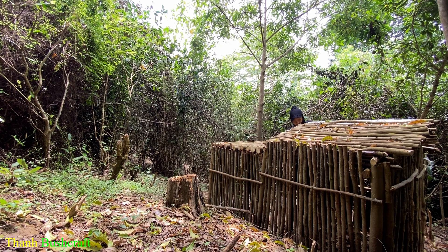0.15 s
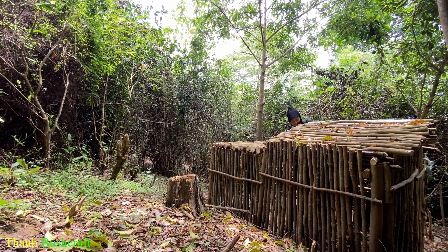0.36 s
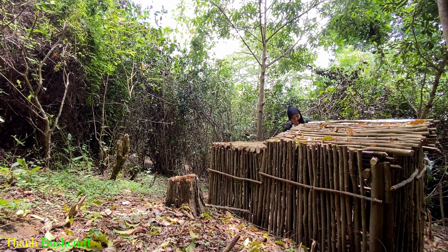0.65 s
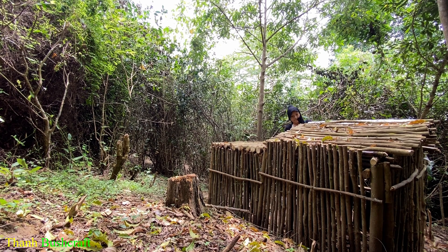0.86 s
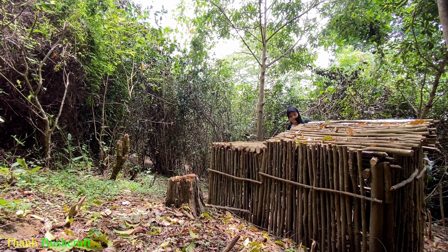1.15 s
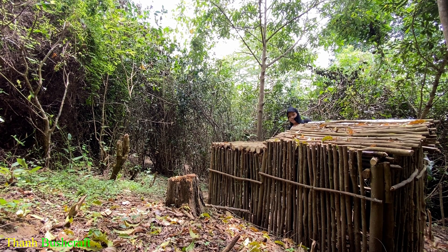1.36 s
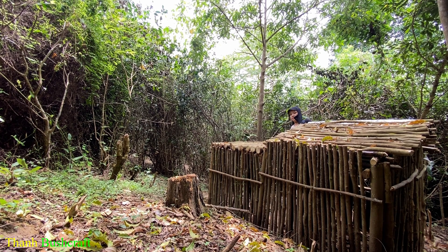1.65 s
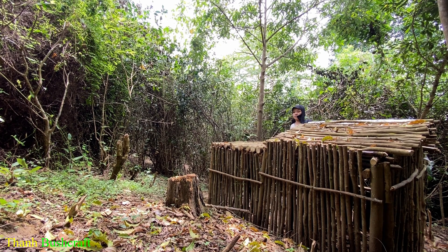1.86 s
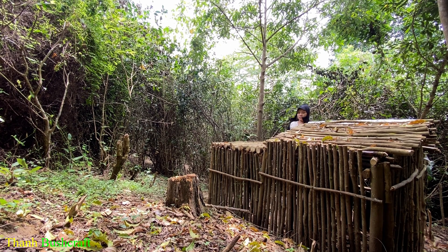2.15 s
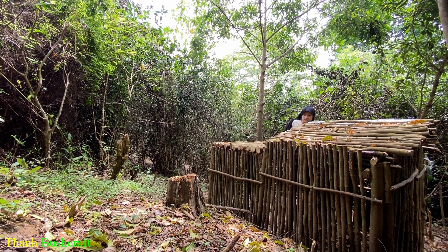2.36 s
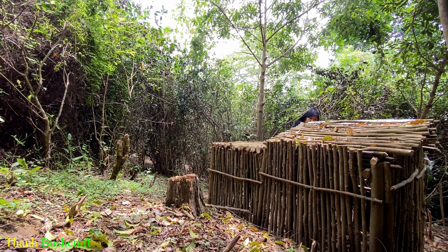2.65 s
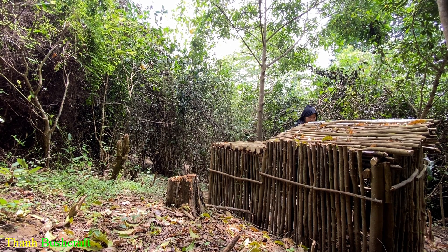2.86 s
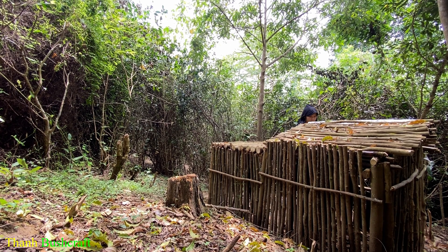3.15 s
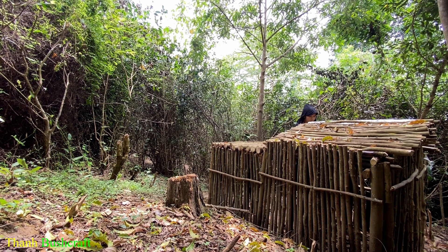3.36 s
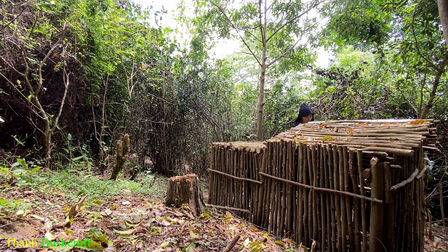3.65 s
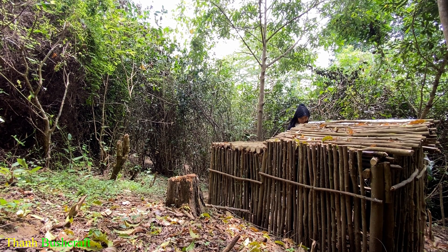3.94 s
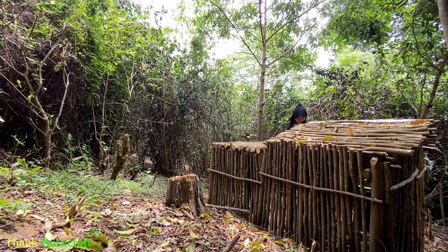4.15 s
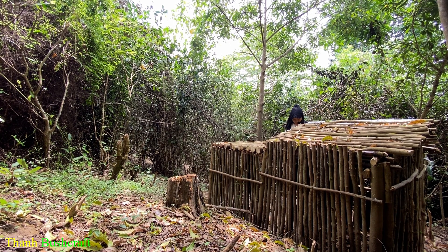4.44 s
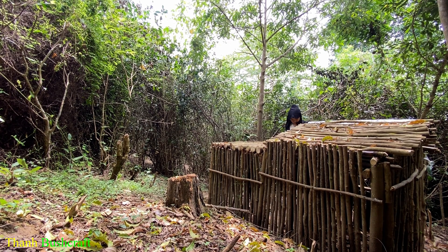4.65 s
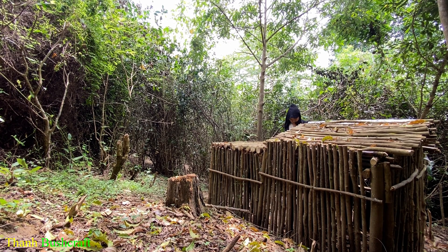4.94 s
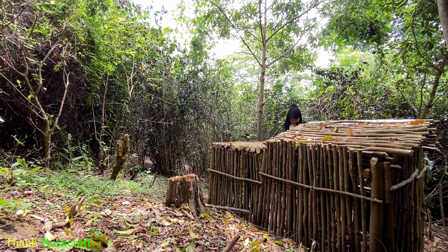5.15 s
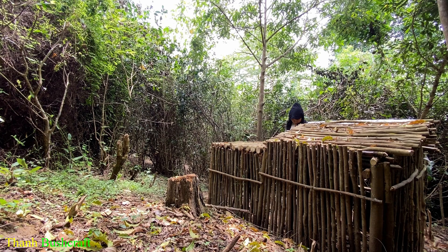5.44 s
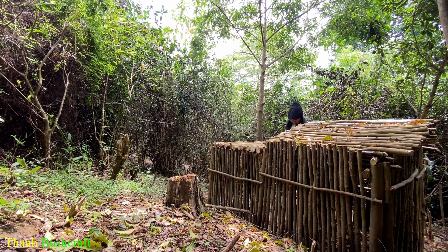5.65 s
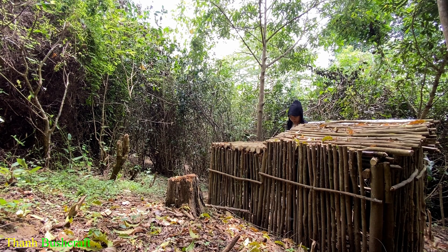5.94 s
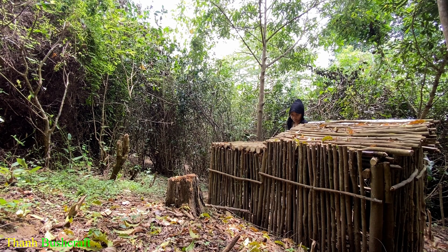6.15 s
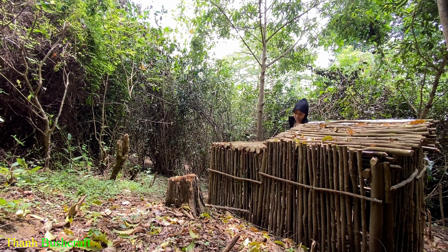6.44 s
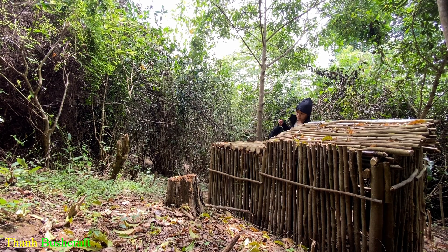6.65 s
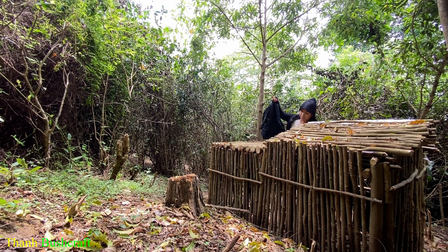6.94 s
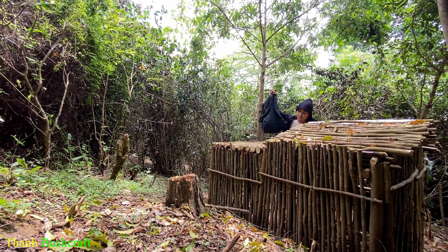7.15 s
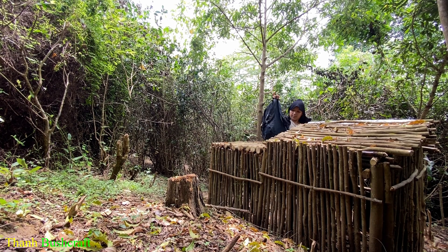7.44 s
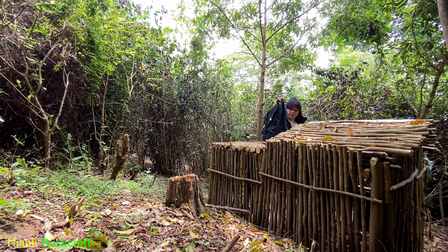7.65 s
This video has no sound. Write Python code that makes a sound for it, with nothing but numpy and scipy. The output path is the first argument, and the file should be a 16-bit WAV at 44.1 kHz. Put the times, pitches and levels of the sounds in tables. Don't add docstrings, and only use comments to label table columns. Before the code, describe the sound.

A forest clearing rings with constant high insects for nearly eight seconds: a steady cricket around 4.7 kHz, pulsing gently, a rougher one sliding down and climbing back about every 0.8 seconds, scratchy katydids near 7.5 kHz and a blurred cicada buzz. A low bird whistle flicks upward at 0.1 and 2.1. A smaller bird's faint, rapid falling phrases come around 1.6, 3.4, 5.0 and 6.8, blurred by trees. A far frog croaks faintly at 1.5-1.8, then more often from 3.6 to 6.7. Sticks knock at 0.4 and 1.4, more busily from 2.2 to 3.8, with a firm knock at 3.25; hollow taps follow at 4.8 and 5.3, and handling resumes from 6.2 to 7.1. Soft cloth rubs and leaf brushes accompany them. At 7.47 a bundle lands, by far the loudest event: a sharp crack and tumbling, hollow wooden clatter settling by 7.7. Faint rumble and hiss lie beneath; both channels are identical.

```python
import sys
import numpy as np
from scipy import signal
from scipy.fft import rfft, irfft, next_fast_len
from scipy.io import wavfile
from scipy.ndimage import uniform_filter1d, map_coordinates

SR = 44100
rng = np.random.default_rng(int(sys.argv[2]) if len(sys.argv) > 2 else 0)


def decibels_to_gain(level_db):
    exponent = np.asarray(level_db, float) / 20
    return 10 ** exponent


def output_pcm(signal):
    pcm = np.clip(np.atleast_2d(signal).T, -1, 1) * 32767
    wavfile.write(sys.argv[1], SR, np.round(pcm).astype(np.int16))


N = 343539

# t/s, level/dB
STEADY_LEVEL = [(0, -45.5), (.6, -42.5), (1.1, -45), (2.1, -45.5), (3.5, -45), (5.5, -44), (6.3, -45),
                (7.79, -45.5)]
# f/Hz, level/dB
WING_RADIATION = [(4500, -24), (4570, -4), (4628, -1), (4665, -1), (4700, 0), (4738, 0), (4790, -22)]
# t of slackest wings/s, lowest f/Hz, highest f/Hz
BREATHS = [(-.22, 4628, 4682), (.52, 4629, 4682), (1.24, 4626, 4676), (1.99, 4616, 4678),
           (2.79, 4623, 4677), (3.54, 4621, 4682), (4.26, 4621, 4688), (5.0, 4627, 4686),
           (5.82, 4624, 4692), (6.6, 4637, 4696), (7.37, 4637, 4696), (8.15, 4637, 4696)]
TENSION = [(0, 0), (.14, .2), (.42, .74), (.64, 1), (.76, .9), (.91, .15), (1, 0)]
# t/s, level/dB
UPPER_LEAN = [(0, 1), (3.4, 7.5), (4.2, 7.5), (6, 5), (7.79, 3.5)]
TENSE_LOSS_DB, SIDE_LINE_DB = 3.5, -6.5
# t of lowest tone/s, lowest f/Hz, peak level/dB, delay to peak/s
SAGS = [(0.082, 4266, -47, 0.017), (.34, 4323, -41, 0.28), (1.27, 4230, -40.5, 0.14),
        (2.014, 4180, -41, 0.14), (2.75, 4160, -39.5, 0.18), (3.508, 4118, -39.5, 0.3),
        (4.279, 4210, -39, 0.4), (5.102, 4234, -39, 0.4), (5.916, 4206, -37.5, 0.46),
        (6.781, 4245, -38.5, 0.45), (7.759, 4370, -38, 0.074)]
SWELL_S, START_DB, SLACK_DB, FADE_DB_PER_S = 0.18, -8.5, -7.5, 63

# t/s, peak level/dB, main ring f/Hz, crack level/dB
KNOCKS = [(0.375, -42.5, 360, -10.5), (1.347, -38, 950, -23), (1.375, -45, 442, -15),
          (1.418, -52.5, 1090, 10), (2.151, -49.5, 1094, -14), (2.21, -46, 307, 3),
          (2.293, -43.5, 500, 5.5), (2.644, -41, 1310, -12), (2.648, -39, 2320, -10),
          (2.655, -44, 2490, -10), (2.668, -46, 2400, -8), (2.73, -35, 1040, -32), (2.732, -40, 700, -25),
          (2.787, -49, 1700, 14), (2.79, -38, 706, -9), (2.789, -40.5, 1710, -10), (2.839, -48, 1500, 6),
          (2.924, -49.5, 712, -9), (3.043, -44.5, 727, -18), (3.245, -31.5, 844, -7), (3.292, -47, 694, -3),
          (3.33, -36, 1006, -15), (3.332, -39, 686, -26), (3.33, -37, 1700, -9), (3.675, -49, 700, -10),
          (3.788, -32, 1032, -25), (3.834, -45, 950, 0), (4.257, -38.5, 232, -6), (6.249, -48, 681, -13),
          (6.312, -50, 464, -6), (6.495, -40, 400, -6), (6.873, -35.5, 2070, -18), (6.947, -39.5, 934, -6),
          (7.015, -27.5, 825, -39), (7.086, -44.5, 1982, 6.5), (7.097, -37.5, 743, -12),
          (7.106, -39, 427, -5)]
# t/s, peak level/dB, main ring f/Hz, crack level/dB, t60/s
BUNDLE_DROP = [(7.464, -20.5, 1068, -5, 0.12), (7.4691, -13, 894, -1.5, 0.036),
               (7.47, -23, 1410, -1, 0.054), (7.466, -19, 600, -20, 0.11), (7.476, -27.5, 213, -20, 0.088),
               (7.481, -17, 424, -11, 0.062), (7.489, -23, 322, -17, 0.047), (7.497, -17, 493, -20, 0.06),
               (7.5, -21, 897, -19, 0.097), (7.511, -25, 766, -7, 0.05), (7.521, -24.5, 755, -6, 0.079),
               (7.529, -33, 770, -14, 0.049), (7.543, -16, 1040, -14.5, 0.045),
               (7.544, -27, 1500, -15, 0.046), (7.545, -22, 347, -27, 0.08), (7.547, -22, 728, -25, 0.059),
               (7.557, -29.5, 707, -7, 0.054), (7.574, -35, 980, 3, 0.07), (7.635, -32, 1060, -18, 0.057),
               (7.643, -25.5, 3176, -4, 0.02), (7.645, -32, 753, 2.5, 0.08), (7.649, -28, 1334, -3, 0.055),
               (7.666, -37, 728, -8, 0.036)]
# t/s,
# peak level/dB, f/Hz, t60/s
PURE_RINGS = [(4.843, -39.5, 920, 0.11), (4.845, -47.5, 918, 0.46), (5.338, -44, 301, 0.2),
              (7.469, -21, 2426, 0.11), (7.469, -28, 2606, 0.081), (7.469, -30, 2110, 0.14),
              (7.468, -24.5, 4240, 0.051), (7.47, -22, 424, 0.15), (7.497, -28, 1083, 0.19),
              (7.605, -41, 1170, 0.1), (7.674, -41, 10020, 0.11), (7.673, -41, 14400, 0.081)]
# f/Hz, share of the ring time/1
STICK_MODES = [(215, 0.86), (415, 0.31), (484, 0.23), (700, 1), (759, 0.8), (897, 0.59), (1061, 1),
               (1394, 0.94), (1685, 0.55), (2094, 0.26), (2406, 0.25), (2589, 0.61), (3365, 0.68),
               (4204, 0.92)]
RING_T60_S, RING_SHORTENS = 0.062, 0.23

# t/s, level/dB
NEAR_KATYDID = [(0, -51), (.43, -55), (.78, -51.5), (2.21, -50.5), (2.37, -52.5), (4.08, -50.5),
                (5.05, -54), (5.62, -51), (7.16, -53), (7.79, -51.5)]
# f/Hz, density/(dB per Hz)
KATYDID_WINGS = [(3760, -76), (6400, -23), (6540, -19), (7160, 2), (7340, 5.5), (7530, 8), (7880, -0.5),
                 (8120, -12.5), (8400, -34.5), (10900, -104), (18500, -120)]
CROWD_DB, CROWD_FOLLOWS = -45.5, 0.35

# t from middle note/s, length/s, start f/Hz, top f/Hz, last f/Hz
PHRASE = [
    (-.078, .043, 3330, 3770, 3080),
    (-.016, .037, 2220, 3000, 2200),
    (0.028, 0.054, 3790, 4050, 3230),
    (.1, .04, 2750, 3576, 3150),
    (0.221, 0.035, 2244, 3264, 2535),
]
# t from middle note/s, length/s, from f/Hz, to f/Hz, level/dB
SWEEPS = [(-.407, 0.015, 4280, 3400, 4), (-.396, 0.011, 4210, 3420, 2), (-.386, .011, 4000, 3385, -4),
          (-.376, .011, 3980, 3330, -10), (-.299, 0.024, 4180, 3470, 2), (-.248, 0.018, 3410, 3210, -7),
          (-.185, 0.045, 4140, 4030, 1.5), (-.138, 0.025, 4080, 3420, 5), (0.078, 0.0052, 3200, 2490, -5),
          (-.392, .012, 2800, 2500, -8), (0.196, .012, 3490, 3300, 1), (.184, .012, 4040, 3180, 1),
          (.196, 0.011, 3860, 3270, -3)]
# t/s, level/dB, drag of the closing notes/1
SONGS = [
    (1.572, -55, 1.02),
    (3.391, -56, 1.045),
    (5.026, -55.5, 1.04),
    (6.776, -57.5, 1.02),
]
RISE_S, RISE_LOSS_DB, FALL_BEND = 0.0148, -4.5, 1.32
ARCH_DB = 3
TRUNK_S, TRUNK_DB = 0.014, -13

# t/s, f/Hz, level/dB
WHISTLE = [(-.112, 3060, -4), (-.098, 2280, -7.5), (-.08, 2160, -6.5), (-.045, 2105, -0.5),
           (-.012, 2170, -6), (-.003, 2400, -5), (.003, 3230, -3), (0.013, 3230, 0), (.022, 3050, 2)]
# t/s, level/dB
WHISTLES = [
    (.058, -50),
    (2.082, -49),
]
# delay/s, level/dB
FLICK_ECHOES = [
    (.018, -8),
    (.05, -8),
    (.066, -12),
]

# t/s, peak level/dB
CROAKS = [(1.502, -57), (1.6202, -60), (1.788, -60), (3.6132, -58), (3.689, -55.5), (3.957, -55.5),
          (4.139, -56), (4.319, -54), (4.471, -55.5), (4.762, -61), (5.0807, -56.5), (5.163, -55.5),
          (5.249, -53.5), (5.393, -51), (5.555, -53.5), (5.699, -53.5), (5.865, -55.5), (6.047, -55),
          (6.268, -57.5), (6.475, -58), (6.644, -58), (7.254, -56.5)]
CROAK_S, THROAT_HZ, OVERTONE = 0.0741, 1968, 0.67

# t/s, peak level/dB, length/s, tilt/(dB per octave)
RUBS = [
    (0.2, -55, 0.044, 9),
    (0.717, -65, 0.038, -5),
    (0.926, -72, 0.07, -1),
    (2.186, -55.5, 0.11, -13),
    (2.642, -56.5, 0.19, -7),
    (2.933, -55, 0.087, -10),
    (3.112, -52.5, 0.057, 10),
    (4.112, -59, 0.048, -6),
    (7.083, -55, 0.11, 5),
    (7.737, -55, 0.051, -5),
]
# f/Hz, level/dB
RUB_COLOUR = [(500, -17.5), (1200, 1), (1600, -2.5), (2000, -0.5), (2500, 0), (3500, -3), (5000, -9.5),
              (8000, -37), (15000, -60.5)]
# t/s, peak level/dB, length/s, tilt/(dB per octave)
SWISHES = [
    (0.202, -65.5, 0.069, 6),
    (4.148, -66, 0.086, 3),
    (7.09, -67.5, 0.086, 4),
    (7.452, -56, .016, 1.5),
    (7.463, -44, 0.05, -1),
    (7.491, -48, 0.044, -0.5),
    (7.67, -69, 0.016, 13),
]
# f/Hz, level/dB
SWISH_COLOUR = [(300, 33), (1500, 21), (4000, 15.5), (8500, 1.5), (11000, 6.5), (15500, -15)]

# f/Hz, density/(dB per Hz)
CICADA_DRUM = [(2850, -48), (4850, 1), (4920, -21), (4960, -6), (5360, 2.5), (5600, 2.5), (6030, -4.5),
               (6500, -16), (8450, -74.5), (14300, -120)]
# t/s, added level/dB, half width/s
CICADA_SWELLS = [
    (4.15, 2, 0.052),
    (5.2, 1.5, 0.16),
]
CICADA_DB = -52.5
# f/Hz, width/Hz, level/dB
FAR_CRICKETS = [(1954, 31, -82), (3000, 40, -78.5), (3380, 70, -79), (3770, 60, -80.5), (14400, 230, -88)]

# t/s, added level/dB, half width/s
SOFT_SWELLS = [
    (.1, 8, 0.23),
    (1.6, 21.5, 0.65),
    (3.0, 25.5, 0.99),
    (5.2, 21, 0.72),
    (7.1, 20, 0.9),
]
STILL_DB, RUMBLE_DB, HISS_DB = -82, -55, -68.5
# f/Hz, density/(dB per Hz)
RUMBLE = [(15, -22.5), (25, 6.5), (64, 1), (140, -3), (192, -4), (306, -14), (532, -18), (985, -20.5),
          (1100, -20.5), (2910, -26.5), (3230, -25), (3670, -20), (4300, -32), (4500, -63), (5200, -70),
          (8800, -120)]
# f/Hz, density/(dB per Hz)
HISS = [(5650, -38), (9600, -8), (10300, 1), (10900, 6), (13000, -7.5), (13500, -4), (14900, 0),
        (15800, -8.5)]
# f/Hz, t60/s
TREE_T60 = [(300, 0.032), (3000, 0.66), (8000, 0.69)]
# f/Hz, density/(dB per Hz)
LOST_FLOOR = [(3500, -112), (3950, -101), (4300, -89), (5000, -104), (6000, -102), (6500, -89.5),
              (7000, -103.5), (8300, -99), (9600, -104), (10300, -107), (11000, -106), (13000, -114),
              (15000, -112), (15600, -116), (15800, -64)]


def crickets():
    return steady_cricket() + sagging_cricket()


def steady_cricket():
    breath, low_hz, high_hz = curves([(s, k, lo, hi) for k, (s, lo, hi) in enumerate(BREATHS)])
    tension = uniform_filter1d(np.interp(breath % 1, *np.transpose(TENSION)), size=2500)
    pitch_hz = low_hz + (high_hz - low_hz) * tension
    level_db, = curves(STEADY_LEVEL)
    lean_db, = curves(UPPER_LEAN)
    clear = np.zeros(N)
    for k in (-1, 0, 1):
        hz = pitch_hz * (1 + k / 77.5)
        line_db = SIDE_LINE_DB * abs(k) + (k > 0) * lean_db * tension ** 2
        level = decibels_to_gain(line_db + along(WING_RADIATION, hz) + 2 * wobble(10))
        clear += level * tone(hz + 3 * wobble(25))
    rasp = coloured(rng.standard_normal(N), [(4300, -50), *WING_RADIATION, (5000, -50)])
    return decibels_to_gain(level_db - TENSE_LOSS_DB * tension) * (unit(clear) + 0.34 * rasp)


def sagging_cricket():
    pitch_hz = sagging_pitch() + 6 * wobble(30)
    slack = np.clip((4440 - pitch_hz) / 250, 0, 1)
    rough = np.zeros(N)
    for k in (-1, 0, 1, 2):
        line_db = (3.8 * slack * (k > 0) - 6.5) * abs(k) - (4 - 6.4 * slack) * (k < 0)
        blur_hz = (8 + 30 * slack) * wobble(60)
        rough += decibels_to_gain(line_db + 2.4 * wobble(40)) * tone(pitch_hz + 54 * k + blur_hz)
    return decibels_to_gain(sagging_level() - 3.5) * unit(rough)


def sagging_pitch(top_hz=4458, fall_s=0.14, climb_s=0.13, lazy=0.2):
    t = np.arange(N) / SR
    s, low_hz, _, peak_s = np.transpose(SAGS)[:, :, None]
    fall = np.clip(1 + (t - s) / fall_s, 0, 1)
    climb = np.exp(-np.abs(t - s) / (climb_s + lazy * peak_s))
    sag_hz = (top_hz - low_hz) * np.where(t < s, fall, climb)
    return uniform_filter1d(top_hz - sag_hz.max(axis=0), size=1500)


def sagging_level():
    t = np.arange(N) / SR
    bouts_db = []
    for s, _, db, peak_s in SAGS:
        knots_s = [-SWELL_S - 0.12, -SWELL_S, 0, peak_s, peak_s + 1]
        bouts_db.append(db + np.interp(t - s, knots_s, [-60, START_DB, SLACK_DB, 0, -FADE_DB_PER_S]))
    return np.max(bouts_db, axis=0)


def sticks():
    out = np.zeros(N)
    handled = [(*row, RING_T60_S * (700 / row[2]) ** RING_SHORTENS) for row in KNOCKS]
    for s, db, ring_hz, crack_db, t60_s in handled + BUNDLE_DROP:
        add(out, s, decibels_to_gain(db - 7.0) * stick_contact(ring_hz, crack_db, t60_s))
    t = np.arange(SR // 7) / SR
    rise = 1 - np.exp(-t / 0.00086)
    for s, db, ring_hz, t60_s in PURE_RINGS:
        glide_hz = ring_hz * (1 - 0.39 * np.exp(-t / 0.0017))
        add(out, s, decibels_to_gain(db - 5.0 - 60 * t / t60_s) * rise * tone(glide_hz))
    return out


def stick_contact(ring_hz, crack_db, t60_s):
    t = np.arange(SR // 7) / SR
    rise = 1 - np.exp(-t / 0.00086)
    snap = 1 - np.exp(-t / 0.0004)
    own_decay = decibels_to_gain(-60 * t / t60_s)
    own = own_decay * np.sin(2 * np.pi * ring_hz * t)

    hz, share = np.transpose(STICK_MODES)[:, :, None]
    near_db = -22 * np.abs(np.log2(hz / ring_hz)) + rng.normal(0, 2, hz.shape)
    detuned_hz = hz * rng.normal(1, 0.004, hz.shape)
    modes = decibels_to_gain(near_db - 60 * t / (t60_s * share)) * np.sin(2 * np.pi * detuned_hz * t)

    around_ring = lambda f: (f / ring_hz) ** 3 / (1 + (f / ring_hz) ** 8)
    rattle = unit(filtered(rng.standard_normal(len(t)), around_ring))
    rattle = decibels_to_gain(-60 * t / (1.22 * t60_s)) * rattle

    bark = unit(filtered(rng.standard_normal(len(t)), lambda f: f / 2500 / (1 + (f / 2800) ** 4.7)))
    crack_decay = 0.95 * decibels_to_gain(-60 * t / 0.0069) + 0.3 * own_decay
    crack = decibels_to_gain(crack_db + 3.5) * crack_decay * bark
    return rise * (0.84 * own + 0.95 * modes.sum(axis=0) + 0.57 * rattle) + snap * crack


def katydids():
    near_db, = curves(NEAR_KATYDID)
    crowd_db = CROWD_DB + CROWD_FOLLOWS * (near_db - near_db.mean())
    teeth = np.diff(np.floor(np.cumsum(195.2 + 0.55 * wobble(25)) / SR), prepend=0)
    scrape = 0.55 * coloured(teeth * decibels_to_gain(3 * wobble(15)), KATYDID_WINGS)
    scrape = scrape + coloured(rng.standard_normal(N), KATYDID_WINGS)
    trill = strokes(26 + 0.32 * wobble(1.6), sharp=0.55)
    near = tone(7605 + 22 * wobble(60)) * trill
    stand_out_db = near_db + 2.46 * (near_db + 54.0) - 7.5
    return decibels_to_gain(crowd_db - 1.18) * unit(scrape * (1 + 0.33 * trill)) + decibels_to_gain(stand_out_db) * unit(near)


def whistler():
    out = np.zeros(N)
    when_s, pitch_hz, level_db = np.transpose(WHISTLE)
    t = np.arange(when_s[0], when_s[-1], 1 / SR)
    for s, db in WHISTLES:
        note = decibels_to_gain(db + np.interp(t, when_s, level_db)) * tone(np.interp(t, when_s, pitch_hz))
        add(out, s + when_s[0], note)
        flick = note[t > 0] * np.hanning(np.sum(t > 0))
        for late_s, loss_db in FLICK_ECHOES:
            add(out, s + late_s, decibels_to_gain(loss_db) * flick)
    return out


def small_bird():
    out = np.zeros(N)
    flutter = decibels_to_gain(3.5 * wobble(90) - 1)
    notes = [(s, length, RISE_S, first, top, last, ARCH_DB) for s, length, first, top, last in PHRASE]
    notes += [(s, length, 1 / SR, top, top, last, db) for s, length, top, last, db in SWEEPS]
    for s, song_db, drag in SONGS:
        for start_s, length_s, rise_s, first_hz, top_hz, last_hz, db in notes:
            t = np.arange(round(length_s * SR)) / SR
            start_s = max(start_s, drag * start_s)
            to_go = np.clip(1 - t / rise_s, 0, 1)
            fallen = np.clip((t - rise_s) / (length_s - rise_s), 0, 1)
            pitch_hz = top_hz - (top_hz - first_hz) * to_go ** 1.65
            pitch_hz = pitch_hz - (top_hz - last_hz) * fallen ** FALL_BEND
            husk_hz = rng.normal(0, 100, len(t))
            shape = np.sin(np.pi * t / length_s) ** 0.084 * decibels_to_gain(RISE_LOSS_DB * to_go)
            shape = shape * flutter[round((s + start_s) * SR):][:len(t)]
            note = decibels_to_gain(song_db + db + rng.normal(0, 1.2)) * shape * tone(pitch_hz + husk_hz)
            add(out, s + start_s, note)
            add(out, s + start_s + TRUNK_S, decibels_to_gain(TRUNK_DB) * note)
    return out


def frog():
    out = np.zeros(N)
    u = np.arange(0, 1, 1 / (CROAK_S * SR))
    pulses = np.exp(1.4 * np.cos(2 * np.pi * 135 * u * CROAK_S))
    for s, db in CROAKS:
        drift = unit(uniform_filter1d(rng.standard_normal(len(u)), size=150))
        pitch_hz = THROAT_HZ * (0.93 + 0.11 * np.sin(2.1 * u)) + 40 * drift
        voiced = unit(pulses * tone(pitch_hz))
        upper = unit(pulses * tone(1.9 * pitch_hz + 90 * drift))
        throat = lambda f: 1 / (1 + ((f - 1.21 * THROAT_HZ) / 450) ** 2)
        airy = unit(filtered(rng.standard_normal(len(u)), throat))
        croak = 1.1 * voiced + 0.9 * airy + OVERTONE * upper
        add(out, s, decibels_to_gain(db - 11) * np.sin(np.pi * u) ** 0.5 * croak)
    return out


def rubbing():
    return brush(RUBS, RUB_COLOUR) + decibels_to_gain(11.0) * brush(SWISHES, SWISH_COLOUR)


def brush(events, colour):
    out = np.zeros(N)
    for s, db, length_s, tilt_db in events:
        u = np.arange(0, 1, 1 / (length_s * SR))
        grain_db = 1.8 * np.repeat(rng.standard_normal(len(u) // 100 + 1), 100)[:len(u)]
        grit = rng.standard_normal(len(u)) * decibels_to_gain(grain_db)
        shade = lambda hz: decibels_to_gain(along(colour, hz) + tilt_db * np.log2(hz / 2000 + 0.1))
        add(out, s, decibels_to_gain(db - 2.0) * np.sin(np.pi * u) ** 0.5 * unit(filtered(grit, shade)))
    return out


def far_insects():
    level_db = CICADA_DB + swells(CICADA_SWELLS)
    buzz = 1 + 0.092 * strokes(200 + 5 * wobble(0.43), sharp=1.3)
    choir = coloured(rng.standard_normal(N) * buzz, CICADA_DRUM)
    out = decibels_to_gain(level_db + 1.48 + 1.6 * wobble(18)) * choir
    for hz, width_hz, db in FAR_CRICKETS:
        drift_hz = width_hz * (0.4 * wobble(3) + 0.9 * wobble(90))
        out += decibels_to_gain(db + 3 * wobble(3)) * tone(hz + drift_hz)
    return out


def air():
    soft_db = STILL_DB + swells(SOFT_SWELLS)
    rumble = decibels_to_gain(RUMBLE_DB + 0.7 * wobble(6)) * coloured(rng.standard_normal(N), RUMBLE)
    soft_noise = decibels_to_gain(soft_db - 5.5 + 2.8 * wobble(9.7)) * coloured(rng.standard_normal(N), RUB_COLOUR)
    hiss = decibels_to_gain(HISS_DB + 0.88 * wobble(24)) * coloured(rng.standard_normal(N), HISS)
    return rumble + soft_noise + hiss


def trees(x):
    hz, t, z = signal.stft(rng.standard_normal(SR // 2), SR, nperseg=256)
    decay = decibels_to_gain(-60 * t / along(TREE_T60, hz)[:, None])
    tail = signal.istft(z * decay, SR, nperseg=256)[1]
    return signal.fftconvolve(np.pad(x, (300, 0)), tail / np.linalg.norm(tail))[:N]


def unit(x):
    return x / np.sqrt(np.mean(x ** 2) + 1e-20)


def along(points, hz):
    f, v = np.transpose(points)
    return np.interp(np.log(hz + 1), np.log(f + 1), v)


def curves(rows):
    s, *cols = np.transpose(rows)
    return [np.interp(np.arange(N) / SR, s, c) for c in cols]


def swells(rows):
    s, db, width_s = np.transpose(rows)[:, :, None]
    return (db * np.exp(-((np.arange(N) / SR - s) / width_s) ** 2 / 2)).max(axis=0)


def wobble(rate_hz):
    knots = rng.standard_normal(int(N * rate_hz / SR) + 4)
    return map_coordinates(knots, [np.arange(N) * rate_hz / SR])


def filtered(x, response):
    m = next_fast_len(len(x) + 2048)
    return irfft(rfft(x, m) * response(np.fft.rfftfreq(m, 1 / SR)), m)[:len(x)]


def coloured(x, spectrum):
    return unit(filtered(x, lambda hz: decibels_to_gain(along(spectrum, hz))))


def strokes(rate_hz, sharp):
    return unit(np.exp(sharp * np.cos(2 * np.pi * np.cumsum(rate_hz * np.ones(N)) / SR)))


def tone(hz):
    return np.sin(2 * np.pi * np.cumsum(hz) / SR)


def add(track, s, sound):
    i = round(s * SR)
    part = track[max(i, 0):][:len(sound) + min(i, 0)]
    part += sound[max(-i, 0):][:len(part)]


def scene():
    chirr, wood, near_bird = crickets(), sticks(), whistler()
    song = small_bird() + frog()
    echoes = trees(decibels_to_gain(-5) * song + decibels_to_gain(-12) * near_bird + decibels_to_gain(-14) * wood + decibels_to_gain(-9) * chirr)
    mono = chirr + wood + near_bird + song + echoes
    mono = mono + katydids() + rubbing() + far_insects() + air()
    return np.array([mono, mono])


def low_pass(x):
    return signal.sosfilt(signal.butter(12, 16660, fs=SR, output="sos"), x)


def record(dry):
    heard = filtered(dry[0], lambda f: 1 / (1 + (41 / (f + 1)) ** 8))
    hz, t, z = signal.stft(heard, SR, nperseg=2048, scaling="psd")
    strength = np.sqrt(2 * uniform_filter1d(np.abs(z) ** 2, size=5, axis=0))
    limit = decibels_to_gain(along(LOST_FLOOR, hz)[:, None] + 2.3 * rng.standard_normal(len(t)))
    kept = signal.istft(z * (strength > limit), SR, nperseg=2048, scaling="psd")[1][:N]
    return low_pass(np.array([kept, kept]))


dry = scene()
out = record(dry)
output_pcm(out)
```